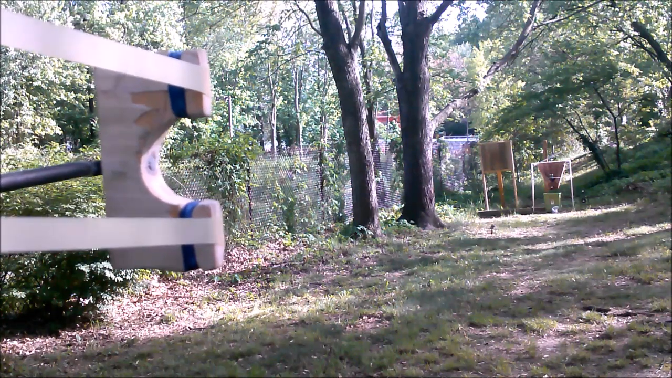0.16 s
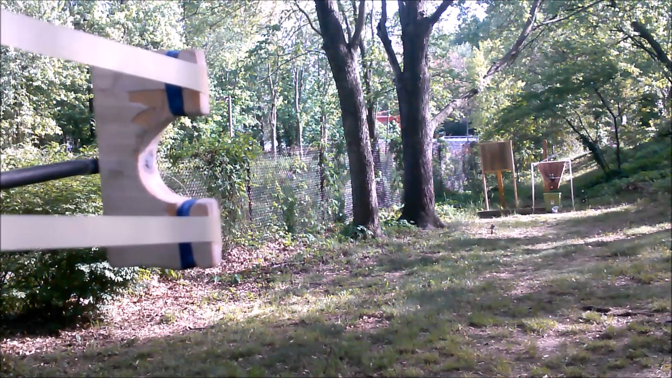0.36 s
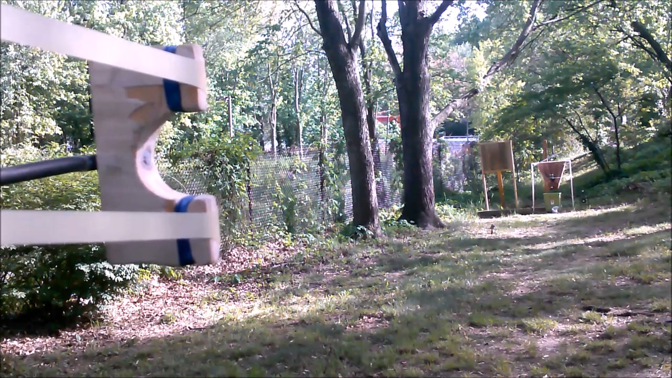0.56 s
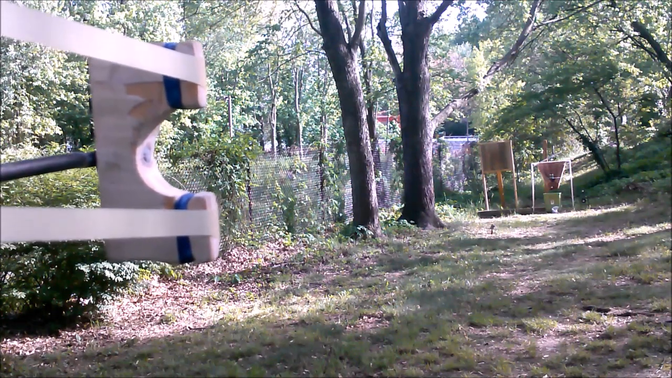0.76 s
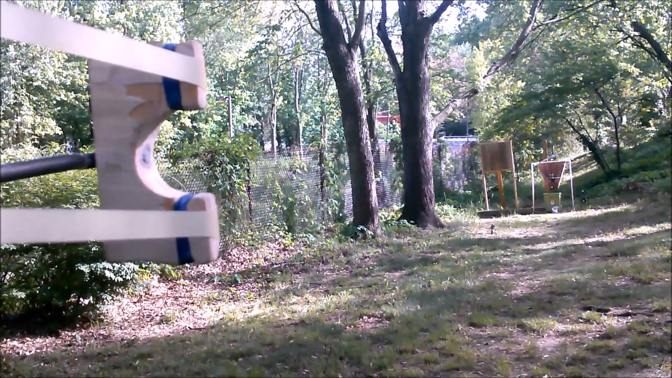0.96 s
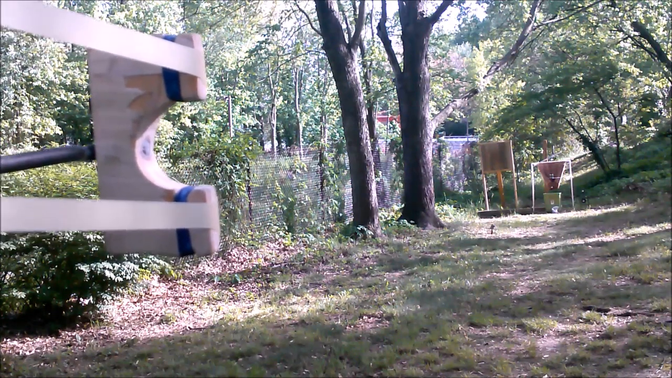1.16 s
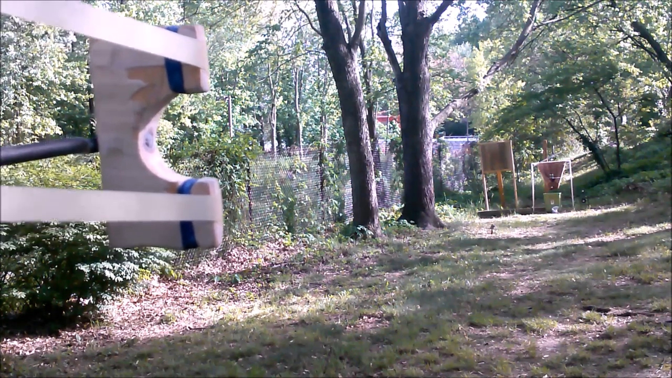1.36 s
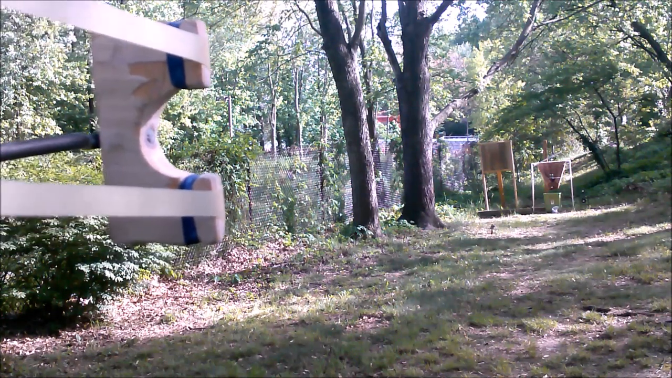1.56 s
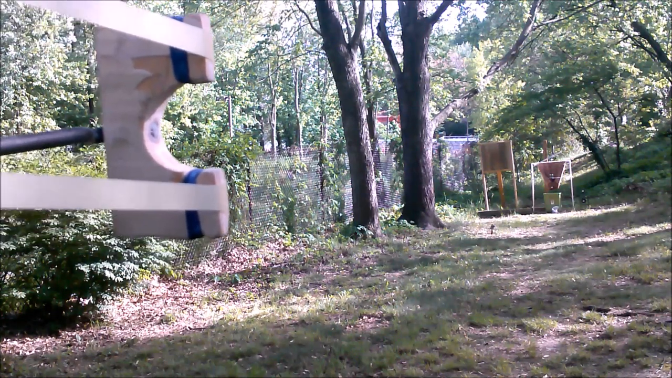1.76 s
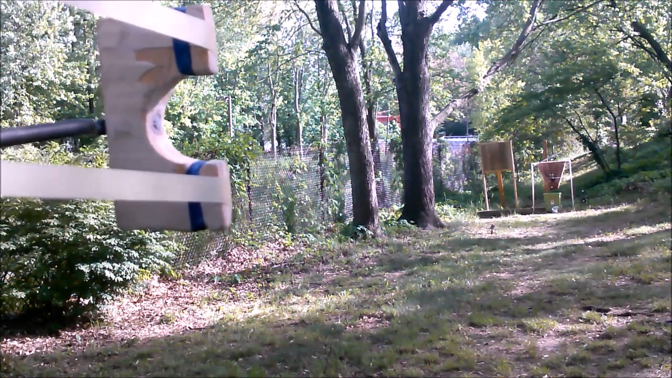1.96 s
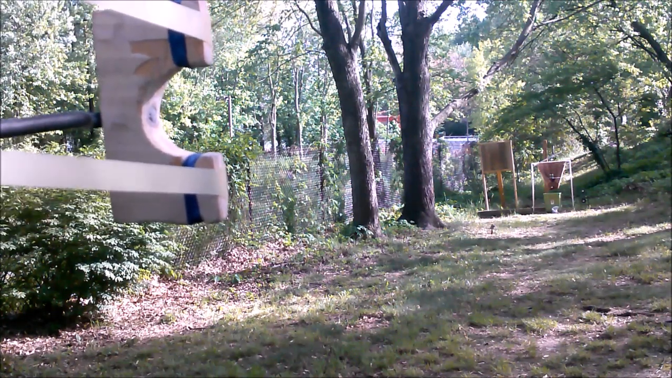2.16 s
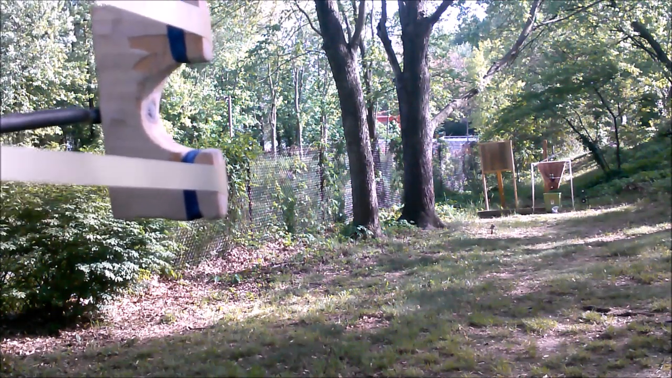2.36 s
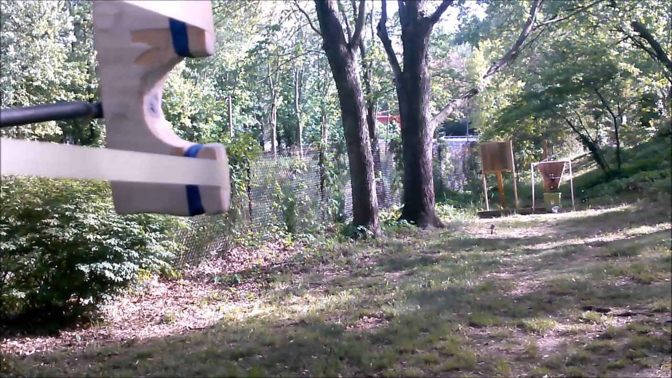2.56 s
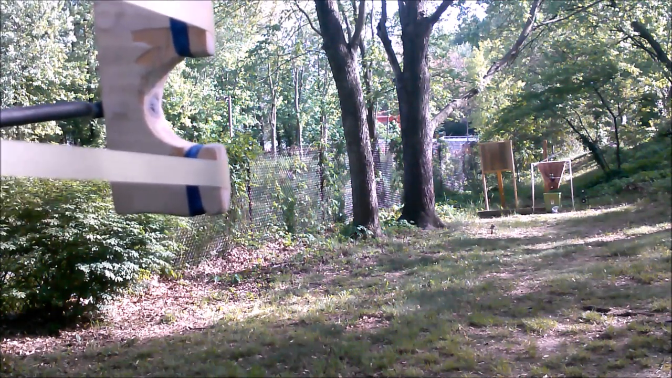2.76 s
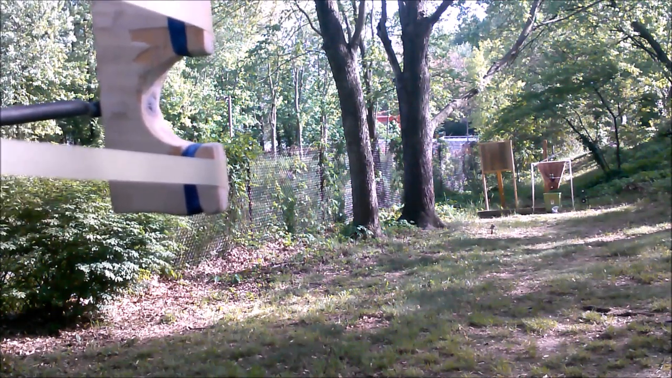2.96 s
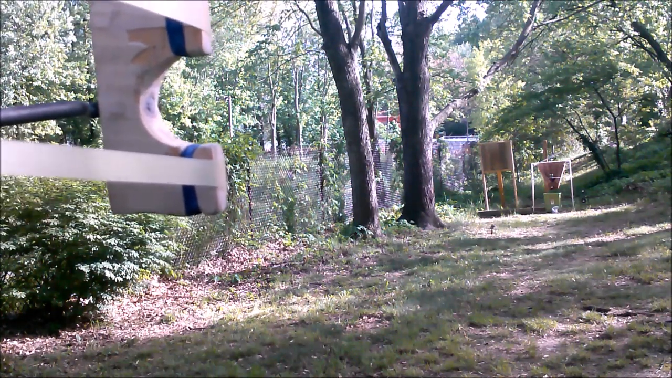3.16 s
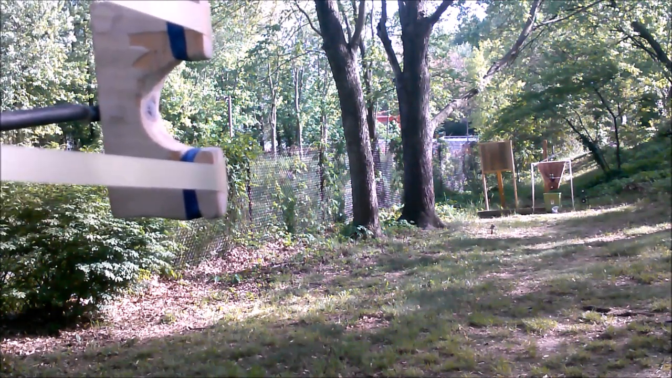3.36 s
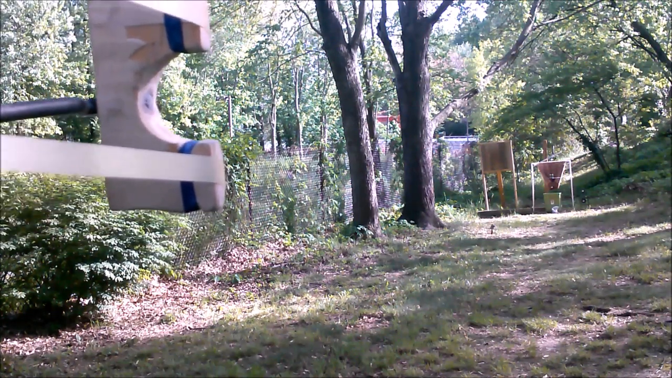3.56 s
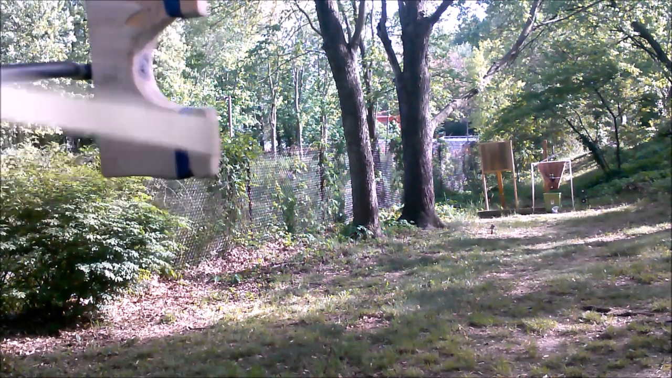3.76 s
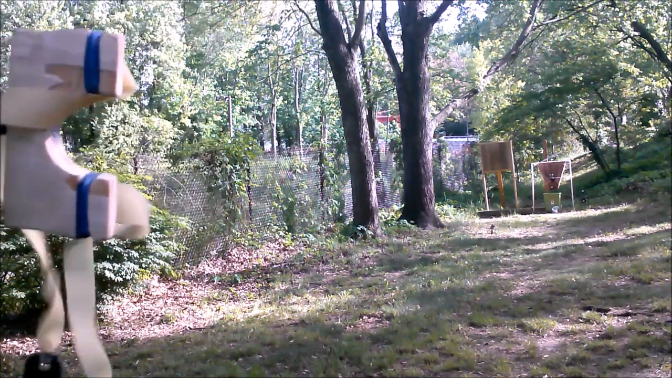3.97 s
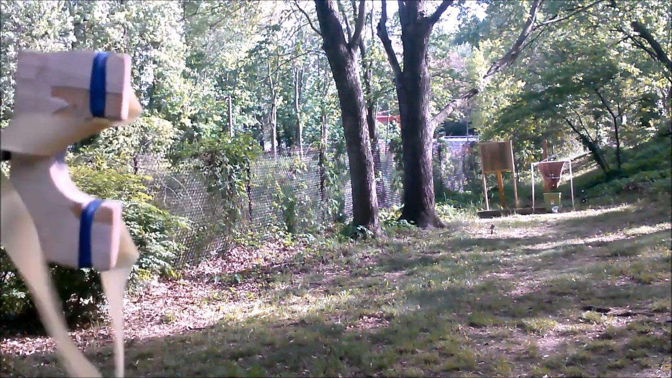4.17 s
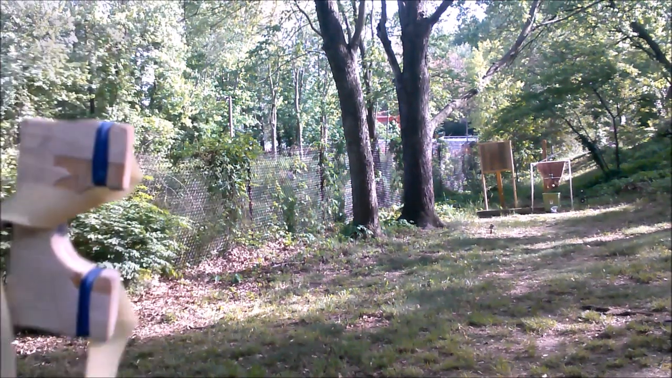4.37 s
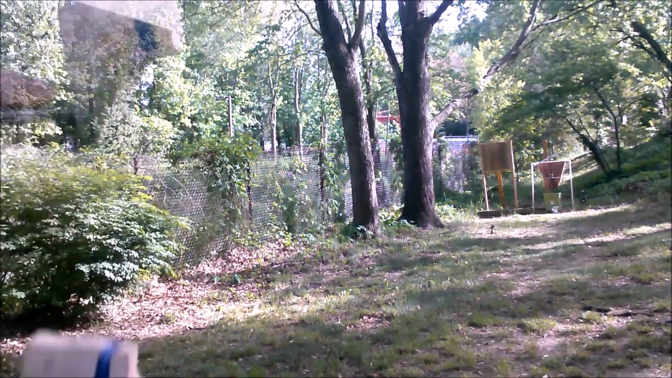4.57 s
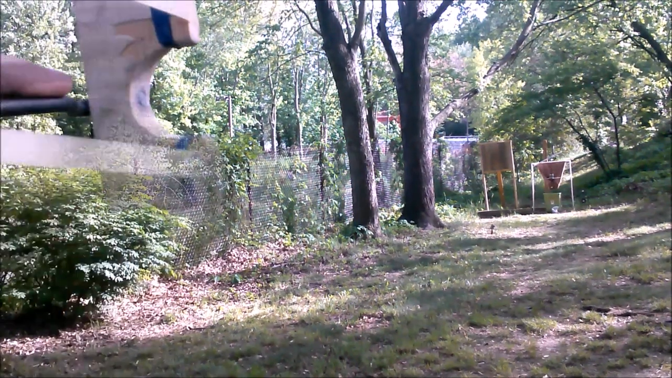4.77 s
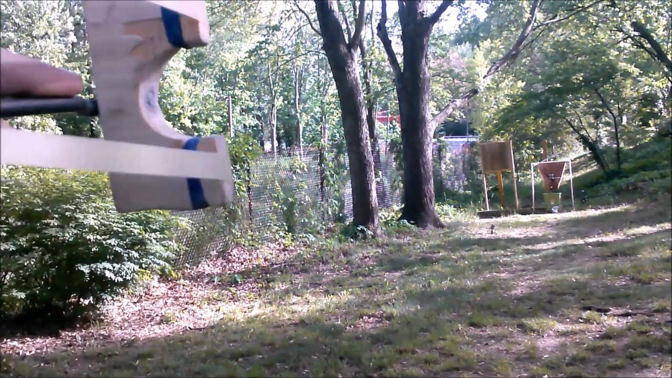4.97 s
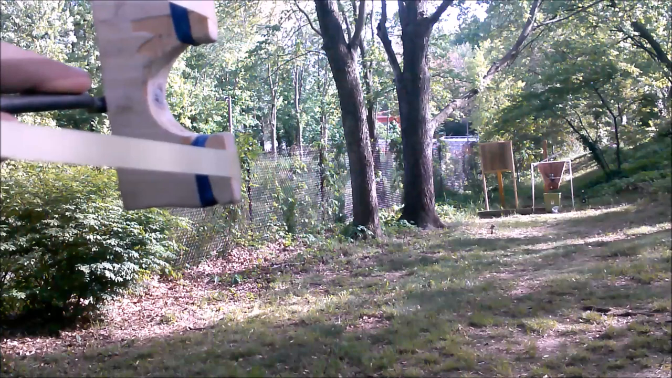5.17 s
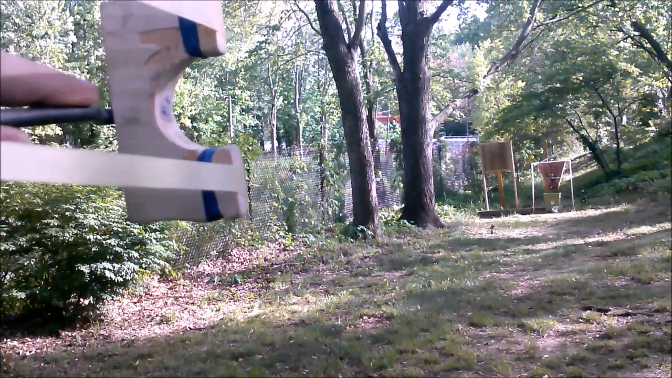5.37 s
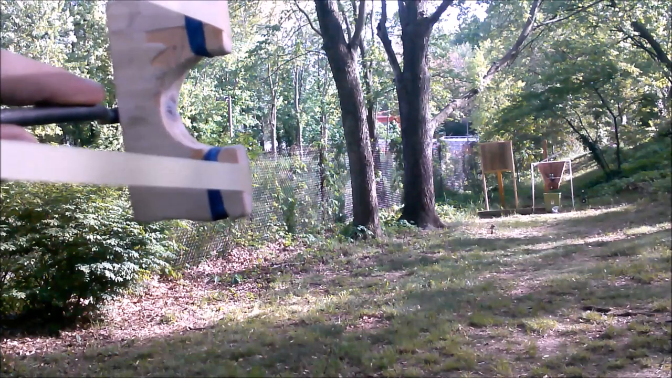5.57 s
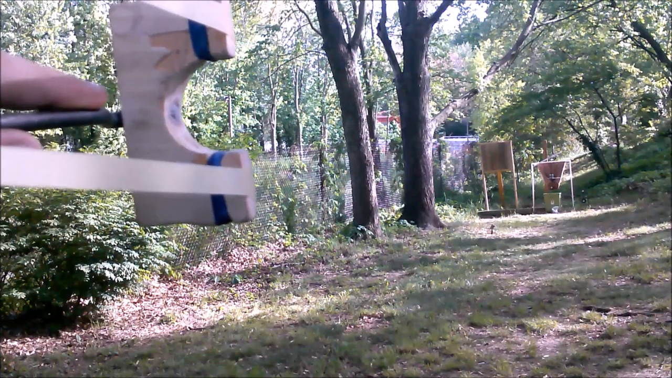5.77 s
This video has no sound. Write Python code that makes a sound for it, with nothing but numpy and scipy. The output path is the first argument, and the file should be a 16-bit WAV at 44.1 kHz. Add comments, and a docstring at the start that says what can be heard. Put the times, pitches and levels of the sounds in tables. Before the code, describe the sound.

Soft wind rumble and faint birdsong, broken near four seconds by a slingshot's overloaded snap, a hard far hit, then small wooden knocks and a high whistle.

```python
"""A low rumble, a breeze in the leaves and small birds are heard first, with a faint rasp of insects.
Then a slingshot fires close to the microphone: its rubber bands rush past, slap the fork and whip back.
They shove air at the microphone; the shot cracks on a far target, the trees answer and the frame knocks.
Wind, rubber and insects are coloured noise; birds and wood are sine waves, the wood with a noisy click;
the target is a filtered click with a noisy tail; the trees smear sounds into an uneven, fading tail."""
import sys
import numpy as np
from scipy import signal
from scipy.fft import rfft, irfft, next_fast_len
from scipy.io import wavfile
from scipy.ndimage import map_coordinates

SR = 44100
rng = np.random.default_rng(int(sys.argv[2]) if len(sys.argv) > 2 else 0)


def digitize_waveform(pressure):
    """Quantize a signal to 16-bit integers and store it at the path in sys.argv[1].

    Rows of a 2-D input are taken as channels; values are limited to [-1, 1].
    """
    field = np.atleast_2d(pressure).T
    bounded = np.clip(field, -1, 1)
    quanta = np.round(bounded * 32767).astype(np.int16)
    wavfile.write(sys.argv[1], SR, quanta)


N = 256662
T = np.arange(N) / SR  # time of every sample, s


def amp(db):
    """Turn decibels into a gain."""
    return 10 ** (np.asarray(db) / 20)


def unit(x):
    """Scale a sound to an rms of 1."""
    return x / np.sqrt(np.mean(x ** 2) + 1e-20)


def fade(t, t60):
    """A decay that loses 60 dB every t60 seconds and stays at 1 before t = 0."""
    return amp(-60 * np.maximum(t, 0) / t60)


def along(points, hz):
    """Read a curve of (f/Hz, value) points on a logarithmic frequency axis."""
    f, v = np.transpose(points)
    return np.interp(np.log(hz + 1), np.log(f + 1), v)


def wobble(rate):
    """A smooth random curve with rate random points a second."""
    points = rng.standard_normal(int(N * rate / SR) + 4)
    return map_coordinates(points, [T * rate])


def bumps(rows):
    """Add up bell-shaped swells given as (t/s, half width/s, height)."""
    return sum(height * np.exp(-((T - s) / width) ** 2) for s, width, height in rows)


def filtered(x, response):
    """Filter a sound by multiplying its spectrum by a gain that depends on frequency."""
    size = next_fast_len(N + SR // 4)
    spectrum = rfft(x, size) * response(np.fft.rfftfreq(size, 1 / SR))
    return irfft(spectrum, size)[:N]


def noise(spectrum):
    """Random noise coloured by a (f/Hz, level/dB) curve, with an rms of 1."""
    white = rng.standard_normal(N)
    return unit(filtered(white, lambda hz: amp(along(spectrum, hz))))


def impulse(spectrum, size=4096):
    """A click of energy 1 with this spectrum, packed as early as possible (minimum phase)."""
    cepstrum = irfft(np.log(amp(along(spectrum, np.fft.rfftfreq(size, 1 / SR)))))
    # folding the second half onto the first removes any sound before the click
    cepstrum[1:size // 2] *= 2
    cepstrum[size // 2 + 1:] = 0
    click = irfft(np.exp(rfft(cepstrum)))
    return click / np.linalg.norm(click)


def note(s, length, hz, glide, quaver, tremble):
    """A gliding, quavering sine of rms 1 with its progress from 0 to 1; silent outside the note."""
    progress = np.clip((T - s) / length, 0, 1)
    on = (progress > 0) & (progress < 1)
    pitch = hz * glide ** progress[on] * (1 + quaver * tremble[on])
    tone = np.zeros(N)
    tone[on] = np.sqrt(2) * np.sin(2 * np.pi * np.cumsum(pitch) / SR)
    return tone, progress


# how long sound lingers among the trees, before stretching: (f/Hz, t60/s)
TREE_DECAYS = [(100, 0.83), (700, 0.49), (2000, 0.41), (7000, 0.47), (11000, 0.37), (15000, 0.2)]


def woods(x, stretch, lumpy_db):
    """Trunks and foliage scatter sound into an uneven tail; most of its treble dies sooner than its bass."""
    hz, t, z = signal.stft(rng.standard_normal(SR), SR, nperseg=256)
    decay = fade(t, stretch * along(TREE_DECAYS, hz)[:, None])
    tail = signal.istft(z * decay, SR, nperseg=256)[1][:SR]
    tail = tail * amp(lumpy_db * wobble(270)[:SR])
    tail = tail * (1 - fade(T[:SR], 0.015))  # the scatter builds up gradually
    return signal.fftconvolve(x, tail / np.linalg.norm(tail))[:N]


# strength of the breeze: (t/s, level/dB)
WIND = [(.15, 1.5), (.7, -1), (1.8, 1), (2.7, 0), (3.8, -0.5), (4.55, .5), (5.15, 4), (5.8, -1)]
# eddies hit the microphone: (t/s, half width/s, rise of the rumble level/dB)
EDDIES = [(.15, 0.13, 6), (.5, 0.037, 7), (1.1, 0.17, 2.5), (4.78, 0.064, 3), (5.15, 0.039, 7)]
# gusts stir the leaves: (t/s, half width/s, rise of the hiss level/dB)
GUSTS = [(.28, 0.17, 6), (.98, .14, 7), (1.54, 0.064, 6.5), (2.25, 0.22, 2.5), (3.2, .22, 1.5),
         (3.6, 0.11, 7), (5.2, 0.99, 8.5)]
# colour of the rumble at the microphone: (f/Hz, relative level/dB per Hz)
RUMBLE_COLOUR = [(8.8, -34), (15, 2), (32, -0.5), (55, 0.5), (97, -11), (124, -11), (146, -19), (200, -20),
                 (260, -45.5), (440, -120)]
# colour of the distant rush: (f/Hz, relative level/dB per Hz)
RUSH_COLOUR = [(100, -4), (180, 0), (350, 1), (650, -1.5), (950, -2.5), (1250, -13.5), (2000, -16.5),
               (2600, -17.5), (3500, -25.5), (4400, -18.5), (5300, -28.5), (12000, -46)]
# colour of the leaves, also used by the ticks: (f/Hz, relative level/dB per Hz)
LEAF_COLOUR = [(2000, -15), (5500, -6), (6500, -2), (7500, 2), (9000, 2.5), (10500, -4), (13000, -5),
               (15800, -9)]
RUMBLE_DB, RUSH_DB, HISS_DB = -44.5, -55.5, -69  # each layer at a strength of 0 dB, before its swells
RUMBLE_GROWS, RUSH_GROWS, HISS_GROWS = 0.32, 0.69, 0.6  # dB per dB of strength


def breeze():
    """One wind drives a lumpy rumble at the microphone, a distant rush and the gusty hiss of leaves."""
    wind_db = np.interp(T, *np.transpose(WIND))
    lumpy = unit(noise(RUMBLE_COLOUR) * amp(4.0 * wobble(24)))
    rumble = amp(RUMBLE_DB + RUMBLE_GROWS * wind_db + bumps(EDDIES)) * lumpy
    rush_db = RUSH_DB + RUSH_GROWS * wind_db + 1.6 * wobble(25)
    rush = amp(rush_db) * noise(RUSH_COLOUR)
    hiss_db = HISS_DB + HISS_GROWS * wind_db + bumps(GUSTS) + 0.9 * wobble(11)
    hiss = amp(hiss_db) * noise(LEAF_COLOUR)
    return rumble + rush + hiss


INSECT_HZ, INSECT_WIDTH_HZ, INSECT_DB = 4370, 320, -73  # pitch, half width, level at the top of the swell
INSECT_TOP_S, INSECT_SWELL_S = 1.07, 0.44  # middle of the swell, its half width


def insects():
    """A narrow band of noise makes a faint, trembling rasp that swells and sinks."""
    white = rng.standard_normal(N)
    rasp = unit(filtered(white, lambda hz: np.exp(-((hz - INSECT_HZ) / INSECT_WIDTH_HZ) ** 2)))
    swell = bumps([(INSECT_TOP_S, INSECT_SWELL_S, amp(INSECT_DB))])
    return swell * amp(2 * wobble(29.5)) * rasp


# faint dry ticks in the leaves: (t/s, level/dB)
TICKS = [(3.074, -58), (3.137, -55), (3.168, -60), (3.418, -52.5)]
TICK_T60_S = 0.025


def ticks():
    """Each tick is a short burst of noise with the colour of the leaves."""
    bursts = sum(amp(db) * (T > s) * fade(T - s, TICK_T60_S) for s, db in TICKS)
    return bursts * noise(LEAF_COLOUR)


# a far bird's rising notes: (t/s, start pitch f/Hz, relative level/dB)
WARBLE = [(0.201, 2560, -63.5), (.36, 2460, -63), (.635, 2547, -58.5), (2.61, 2680, -67), (2.63, 1940, -63),
          (2.925, 1930, -63), (3.08, 2560, -65), (3.21, 1920, -66), (3.29, 2500, -65), (3.495, 2510, -63),
          (3.704, 2540, -59), (4.865, 2590, -58.5)]
# a near bird's falling chips in two voices: (t/s, start pitch of the lower voice f/Hz, relative level/dB)
CHIPS = [(1.585, 3100, -61), (1.744, 3600, -52.5), (1.949, 3786, -48)]
# whistles that fade: (t/s, length/s, start pitch f/Hz, end over start pitch, relative level/dB, quaver/share)
PIPES = [(.223, .15, 6950, 1.05, -48, 0.03), (0.415, .45, 2784, .98, -47, 0.015)]
WARBLE_S, WARBLE_RISE, WARBLE_QUAVER = 0.057, 1.08, 0.024  # length, end over start pitch, share of pitch
CHIP_S, CHIP_FALL, CHIP_QUAVER = 0.0312, 0.77, 0.038  # the same for the chips
UPPER_RATIO, UPPER_S, UPPER_DB = 1.22, 0.046, -2.5  # upper voice: pitch ratio, length, level next to the lower
PIPE_ATTACK_S, PIPE_FADE_DB = 0.071, -33.5  # rise time, loss over the whole note


def birds():
    """Gliding sines make falling chips, a rising warble and fading whistles, blurred by the wood."""
    song, tremble = np.zeros(N), wobble(490)
    short = [(s, WARBLE_S, hz, WARBLE_RISE, WARBLE_QUAVER, db) for s, hz, db in WARBLE]
    for s, hz, db in CHIPS:
        short.append((s, CHIP_S, hz, CHIP_FALL, CHIP_QUAVER, db))
        short.append((s, UPPER_S, hz * UPPER_RATIO, CHIP_FALL, CHIP_QUAVER, db + UPPER_DB))
    for s, length, hz, glide, quaver, db in short:
        tone, progress = note(s, length, hz, glide, quaver, tremble)
        song += amp(db) * np.sqrt(np.abs(np.sin(np.pi * progress))) * tone
    for s, length, hz, glide, db, quaver in PIPES:
        tone, progress = note(s, length, hz, glide, quaver, tremble)
        song += amp(db + PIPE_FADE_DB * progress) * (1 - fade(T - s, PIPE_ATTACK_S)) * tone
    return amp(-3.5) * song + amp(-8.0) * woods(song, stretch=1.0, lumpy_db=2)


CALL_SPAN_S, CALL_TOP_S = (4.74, 5.3), 4.975  # start and end, top of the arch
CALL_DB, CALL_HZ = -46.5, 7480  # relative level and pitch at the top
CALL_DROOP_DB, CALL_DROOP_HZ = -11.5, -220  # change half a call length away from the top
CALL_ROUGH, CALL_CLEAR, CALL_CLEARS_S = 0.036, 0.014, 4.95  # quaver before and after it clears (share of pitch)


def whistle(edge_s=0.11, clearing_s=0.021):
    """A thin, very high sine starts as a rough trill, clears near the top of its arch and sinks away."""
    start, end = CALL_SPAN_S
    arch = ((np.clip(T, start, end) - CALL_TOP_S) / ((end - start) / 2)) ** 2
    clearing = (CALL_CLEARS_S - clearing_s, CALL_CLEARS_S + clearing_s)
    quaver = np.interp(T, clearing, (CALL_ROUGH, CALL_CLEAR))
    pitch = (CALL_HZ + CALL_DROOP_HZ * arch) * (1 + quaver * wobble(500))
    tone = np.sin(2 * np.pi * np.cumsum(pitch) / SR)
    edges = (1 - fade(T - start, edge_s)) * (1 - fade(end - T, edge_s))
    call = amp(CALL_DB + CALL_DROOP_DB * arch) * edges * unit(tone * amp(4.9 * wobble(120)))
    return amp(-5.0) * call + amp(-5) * woods(call, stretch=1.0, lumpy_db=1)


# what is left of the echo's tone: (f/Hz, level/dB)
ECHO_COLOUR = [(500, -27.0), (4500, -21.5), (7500, -17.5), (12000, -21)]


def echo(shot):
    """The trees scatter the shot; soft ground swallows the low mids of the echo, and the air its top."""
    return filtered(woods(shot, stretch=1.0, lumpy_db=4), lambda hz: amp(along(ECHO_COLOUR, hz)))


# colour of the crack on the target: (f/Hz, relative level/dB)
TARGET_COLOUR = [(60, 1), (200, -1.5), (950, -2), (1500, -21), (2000, -6), (3700, -22.5), (5400, -6.5),
                 (6500, -8.5), (9000, -11.5), (10300, -25), (11500, -21.5), (15000, -38)]
# colour of the target's rattling board: (f/Hz, relative level/dB per Hz)
BOARD_COLOUR = [(150, -18.5), (400, -10), (950, 0.5), (1250, -14), (2500, -22), (4000, -15.5), (8000, -32),
                (15000, -50)]
HIT_S = 4.3456  # the shot reaches the target


def target(ground_s=0.0007):
    """A far, hard crack bounces off the ground and scatters in the grass; board and trees answer."""
    t = np.maximum(T - HIT_S, 0)
    paths = amp(-18) * fade(t, 0.014) * (t > 0) * rng.standard_normal(N)  # scatter from the grass
    paths[round(HIT_S * SR)] += amp(2.5)  # straight path
    paths[round((HIT_S + ground_s) * SR)] += amp(-12.5)  # bounce off the ground
    crack = signal.fftconvolve(paths, impulse(TARGET_COLOUR))[:N]
    rattle = amp(-43) * fade(t, 0.49) * (1 - fade(t, 0.043)) * noise(BOARD_COLOUR)
    return crack + rattle + amp(-13.0) * woods(crack, stretch=0.83, lumpy_db=0.5)


# the shot, then the hand, knock the wooden frame:
# (t/s, relative level/dB, click against ring level/dB, decay speed with 1 = free, tilt/dB per octave)
KNOCKS = [(3.934, -12.5, -20.5, 2, -8), (4.8483, -26, -6.5, 0.8, -1.5), (4.854, -34.5, -13, 1, 0.5),
          (4.949, -41, -9, 1.2, 3.5), (5.1106, -28, -10.5, 3, -0.5)]
# ringing tones of the frame: (f/Hz, level before the tilt/dB, t60 when free/s)
FRAME_TONES = [(217.4, -5, 0.14), (292, -6, 0.036), (430, 2.5, .08), (640, -6, 0.077), (1003, -8, 0.059),
               (1800, -17, 0.092), (2080, -16, 0.077)]
# colour of the click: (f/Hz, relative level/dB per Hz)
CLICK_COLOUR = [(300, 7), (2000, -6.5), (5000, -14.0), (14000, -26)]


def frame():
    """Each knock makes the wooden frame ring in fading sines, with a noisy click on top."""
    out, t = np.zeros(N + SR), T[:SR // 2]
    pivot_hz = FRAME_TONES[1][0]  # the tilt leaves this tone alone
    for s, db, click_db, damping, tilt_db in KNOCKS:
        ring = 0
        for hz, level, t60 in FRAME_TONES:
            tone_db = level + tilt_db * np.log2(hz / pivot_hz) + rng.normal(0, 1)
            ring = ring + amp(tone_db) * fade(t * damping, t60) * np.sin(2 * np.pi * hz * t)
        click = amp(click_db) * fade(t, 0.18) * noise(CLICK_COLOUR)[:len(t)]
        knock = amp(db - 5) * (ring + click) * (1 - fade(t, 0.0033))
        out[round(s * SR):][:len(t)] += knock
    return out[:N]


PUFF_S, PUFF_DB, WAKE_DB = 3.9358, -5, -3.5  # the bands pass; level of the swing and of the extra suction
PUFF_SWELL_S, PUFF_TURN_S = 0.034, 0.0011  # build-up, turn to suction
PUFF_T60_S, PUFF_HZ, WAKE_T60_S = 0.06, 33, 0.012  # settling and swing of the air, fade of the extra suction


def puff():
    """Pressure piles up ahead of the bands, suction follows them and the air swings back."""
    t = T - PUFF_S
    swing = fade(-t, PUFF_SWELL_S) * fade(t, PUFF_T60_S) * np.cos(2 * np.pi * PUFF_HZ * np.maximum(t, 0))
    wake = (t > 0) * fade(t, WAKE_T60_S)
    return -np.tanh(t / PUFF_TURN_S) * (amp(PUFF_DB) * swing + amp(WAKE_DB) * wake)


# the pouch hits the fork: (t/s, pressure, f/Hz, t60/s)
POUCH_HIT = (3.945, .36, 560, .035)


def pouch():
    """A quickly fading sine makes a hollow pop, soon damped by the rubber."""
    s, pressure, hz, t60 = POUCH_HIT
    t = np.maximum(T - s, 0)
    return pressure * fade(t, t60) * np.sin(2 * np.pi * hz * t)


# the bands rush through the fork, then whip back: (t/s, relative level/dB, t60/s, share of dull body level/dB)
PASSES = [(3.9339, -3, 0.085, -2.5), (3.974, -0.5, 0.06, -13)]
# loose rubber slaps the fork: (t/s, relative level/dB)
SLAPS = [(3.9407, -3.5), (3.9465, -1), (3.981, -5), (3.9914, -6.5), (3.999, -17.5), (4.019, -21.5)]
# colour of the bright rubber crackle: (f/Hz, relative level/dB per Hz)
RUBBER_COLOUR = [(800, -30), (1800, -17.5), (3200, -16.5), (4200, -10.5), (5500, -10.5), (6600, -4),
                 (7500, 1), (8800, -8), (11500, -13), (15700, -21)]
# colour of the duller flap: (f/Hz, relative level/dB per Hz)
FLAP_COLOUR = [(60, -14.5), (200, -2.5), (380, -10.5), (550, -1), (900, -4), (1500, -7), (2500, -9),
               (5000, -11), (12000, -31)]
RELEASE_S, RELEASE_RISE_S = 3.913, 0.03  # the pouch is let go; the bands gather speed
PASS_SWELL_S, PASS_HOLD_S = 0.011, 0.002  # a pass strikes up quickly and holds briefly
SWISH_DB, SWISH_SWELL_S = -14, 0.05  # the swish that leads it in: level next to the pass, swell
SLAP_SWELL_S, SLAP_T60_S, SLAP_BODY_DB = 0.004, 0.012, -9.5  # shared by all slaps
SLACK_S, SLACK_DB, SLACK_T60_S, SLACK_BODY_DB = 3.99, -31.5, 0.35, -9  # the slack bands flutter out


def bands():
    """Each pass and slap swells and dies as a bright crackle of rubber over a duller flap."""
    strokes = []  # (level over time, share of dull body in dB)
    for s, db in SLAPS:
        slap = amp(db) * fade(s - T, SLAP_SWELL_S) * fade(T - s, SLAP_T60_S)
        strokes.append((slap, SLAP_BODY_DB))
    for s, db, t60, body_db in PASSES:
        swish = amp(SWISH_DB) * fade(s - T, SWISH_SWELL_S)
        swell = np.maximum(fade(s - T, PASS_SWELL_S), swish)
        strokes.append((amp(db) * swell * fade(T - s - PASS_HOLD_S, t60), body_db))
    slack = amp(SLACK_DB) * (T > SLACK_S) * fade(T - SLACK_S, SLACK_T60_S)
    strokes.append((slack, SLACK_BODY_DB))
    # overlapping strokes add as power
    bright = np.sqrt(sum(shape ** 2 for shape, body_db in strokes))
    dull = np.sqrt(sum((shape * amp(body_db)) ** 2 for shape, body_db in strokes))
    flutter = unit(amp(2.6 * wobble(1200))) * (1 - fade(T - RELEASE_S, RELEASE_RISE_S))
    return flutter * (bright * noise(RUBBER_COLOUR) + amp(-5.5) * dull * noise(FLAP_COLOUR))


def scene():
    """The yard, and the shot with its echo and its hit on the target."""
    yard = breeze() + insects() + ticks() + birds() + whistle()
    shot = bands() + pouch() + frame()
    return (yard + echo(shot) + target() + puff() + shot)[None]


# the level dips briefly: (t/s, half width/s, change of level/dB)
DIPS = [(.7, 0.17, -1.5), (.865, 0.024, -13), (2.285, 0.028, -12.5), (4.2, 0.072, -3), (4.261, 0.015, -37),
        (4.67, 0.031, -8.5)]
TOP_HZ = 15830  # band limit


def record(dry, top=0.77, hardness=5):
    """The level dips now and then, loud peaks are squashed below top, and a steep filter cuts the treble."""
    x = dry[0] * amp(bumps(DIPS))
    x = x / (1 + np.abs(x / top) ** hardness) ** (1 / hardness)  # the snap overloads the input
    return filtered(x, lambda hz: 1 / (1 + (hz / TOP_HZ) ** 300))[None]


dry = scene()
out = record(dry)
digitize_waveform(out)
```